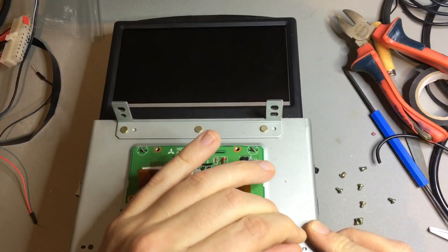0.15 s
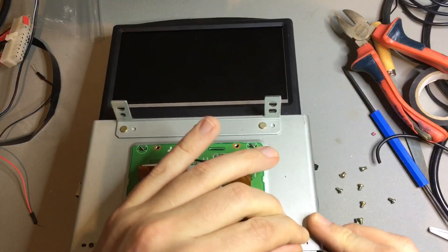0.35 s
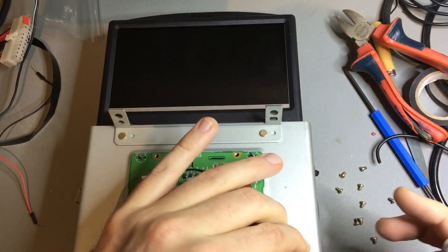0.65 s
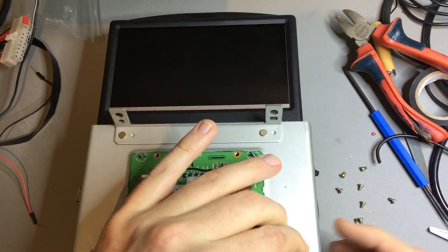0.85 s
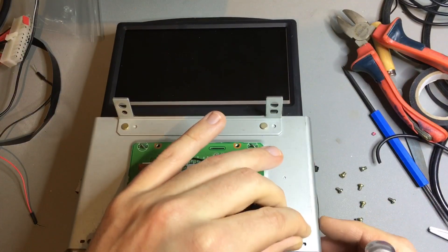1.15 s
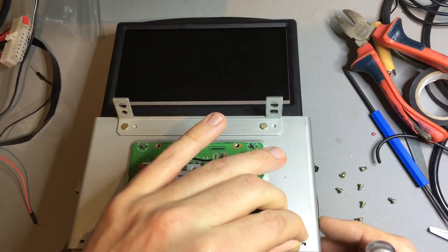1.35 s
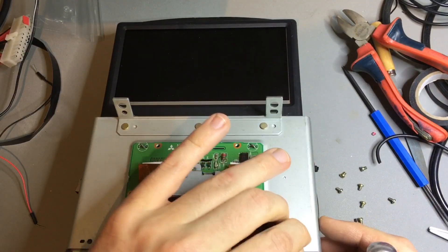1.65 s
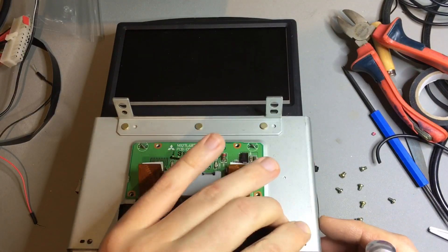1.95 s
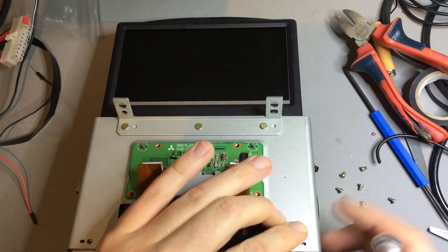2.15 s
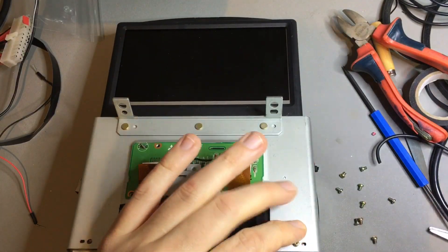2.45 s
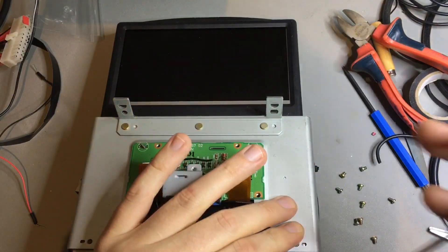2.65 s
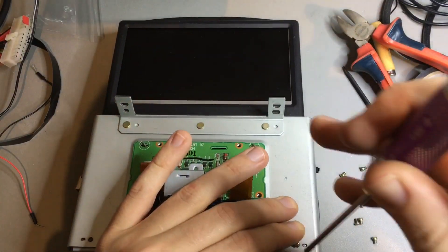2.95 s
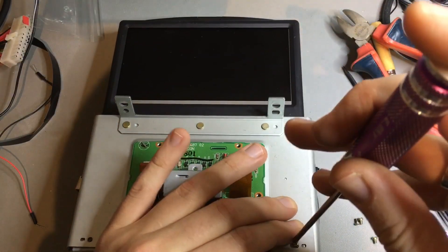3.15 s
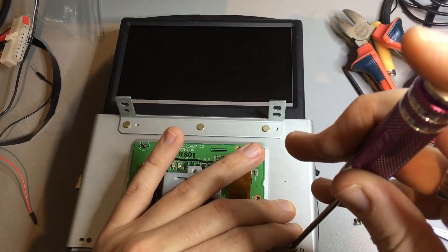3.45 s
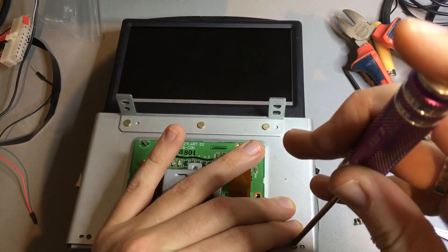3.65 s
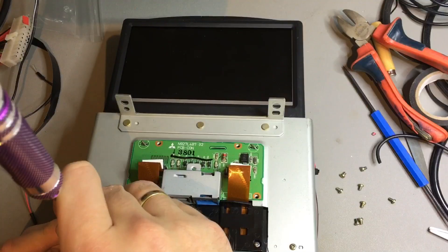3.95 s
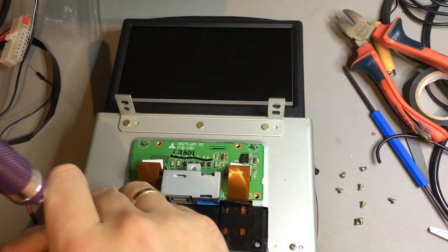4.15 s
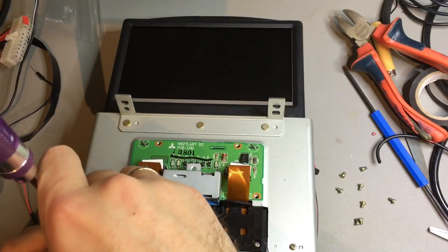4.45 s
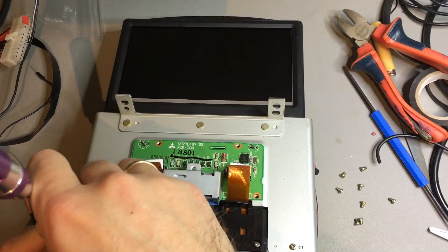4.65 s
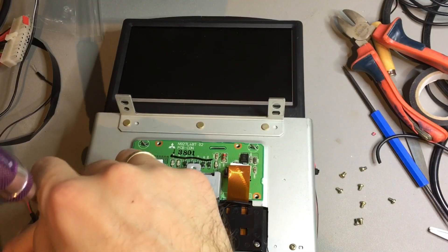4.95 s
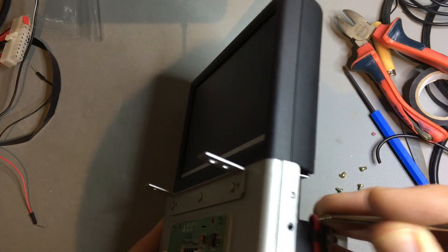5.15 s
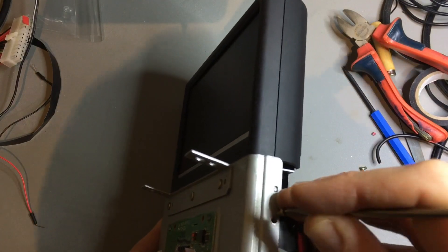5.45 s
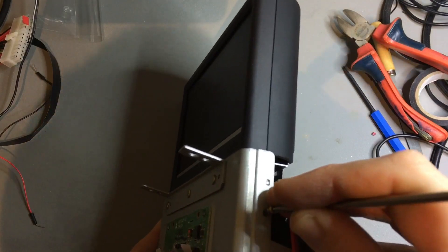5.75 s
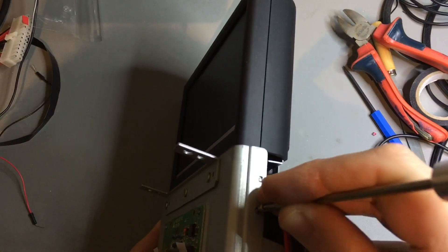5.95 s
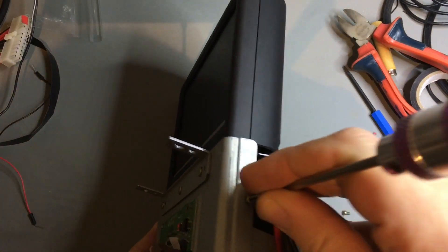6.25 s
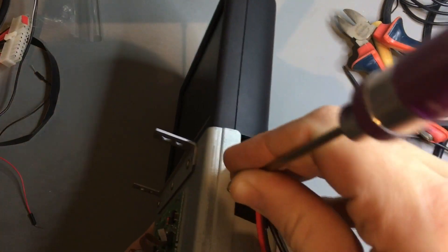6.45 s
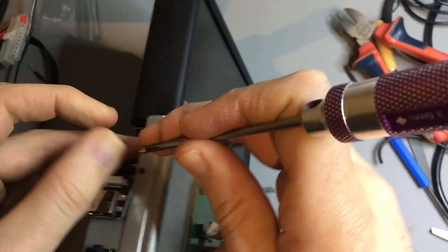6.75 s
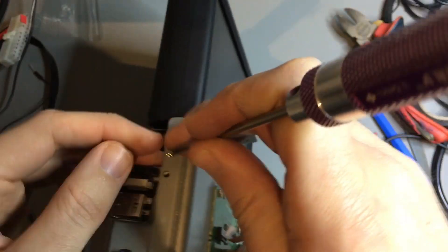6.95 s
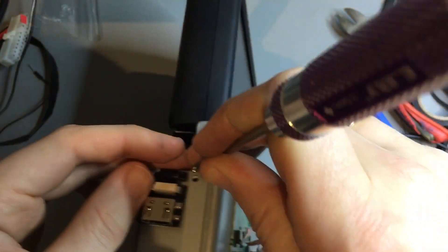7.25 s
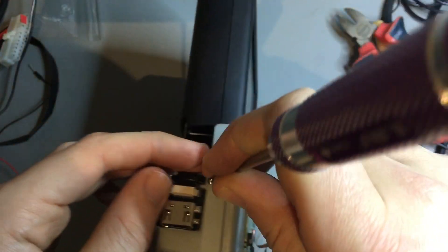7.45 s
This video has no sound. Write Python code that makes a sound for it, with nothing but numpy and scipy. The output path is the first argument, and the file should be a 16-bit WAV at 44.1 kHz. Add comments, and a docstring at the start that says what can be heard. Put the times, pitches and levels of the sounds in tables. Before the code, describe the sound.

Irregular screwdriver and small-part taps on thin metal, dry and close, with short rattles and little room echo. One heavy knock comes early, followed by crisp clicks, finger rustle and light scrapes, then more knocks mid-way and strong metallic snaps past six seconds. The bench rumbles softly under the hands. Three very brief dropouts interrupt the quiet hum and hiss.

```python
"""Metal tapping on a workbench

Small screws, fingers and a steel screwdriver tap and scrape a sheet-metal housing: noise bursts and rubbing
noise drive its resonances, and single modes ring on. Thuds are decaying bench modes.
The bench's trembling, the quiet room's hum and the microphone's hiss are shaped noise.
Three times all sound dips by 40 dB and returns within a few hundredths of a second."""
import sys
import numpy as np
from scipy import signal
from scipy.fft import rfft, irfft, next_fast_len
from scipy.io import wavfile
from scipy.ndimage import map_coordinates

SR = 44100
rng = np.random.default_rng(int(sys.argv[2]) if len(sys.argv) > 2 else 0)


def persist_wave(psi):
    """Save psi, clipped to +-1, as 16-bit WAV."""
    counts = np.round(np.clip(psi, -1, 1) * 32767).astype(np.int16)
    wavfile.write(sys.argv[1], SR, np.atleast_2d(counts).T)


N = 335204
CLIP_S = np.arange(N) / SR
EVENT_S = np.arange(SR // 2) / SR


def amp(db):
    """Gain of a level in dB."""
    return 10 ** (np.asarray(db) / 20)


def unit(x):
    """Scale to rms 1."""
    return x / np.sqrt(np.mean(x ** 2) + 1e-20)


def along(points, hz):
    """Interpolate (f/Hz, value) points on a log frequency axis."""
    f, v = np.transpose(points)
    return np.interp(np.log(hz + 1), np.log(f + 1), v)


def wobble(knots_per_s):
    """Smooth random curve through normally distributed knots."""
    knots = rng.standard_normal(int(N * knots_per_s / SR) + 4)
    return map_coordinates(knots, [np.arange(N) * knots_per_s / SR])


def filtered(x, response):
    """Apply a frequency response; zero padding leaves room for its decay."""
    size = next_fast_len(x.shape[-1] + 8192)
    spectrum = rfft(x, size) * response(np.fft.rfftfreq(size, 1 / SR))
    return irfft(spectrum, size)[..., :x.shape[-1]]


def noise(spectrum):
    """Coloured noise of rms 1; the table sets its spectral shape."""
    return unit(filtered(rng.standard_normal(N), lambda hz: amp(along(spectrum, hz))))


def add(track, start_s, x):
    """Mix x into the track, cut at the track's end."""
    i = round(start_s * SR)
    track[i:i + len(x)] += x[:N - i]


# Room hum and microphone hiss, relative density: f/Hz, level/dB
FLOOR_SPECTRUM = [(22, -20), (40, 5.5), (70, 3), (126, -8.5), (425, -12), (527, -19), (620, -16.5),
                  (1980, -23.5), (3300, -24.5), (4820, -29), (5820, -25.5), (10300, -26), (13000, -20.5),
                  (15600, -23), (16000, -55)]
FLOOR_RMS_DB = -66


def steady_floor():
    """Room hum and microphone hiss as one stationary coloured noise."""
    return amp(FLOOR_RMS_DB) * noise(FLOOR_SPECTRUM)


# Trembling, relative density: f/Hz, level/dB
TREMBLE_SPECTRUM = [(20, -120), (40, 5.5), (65, 5), (110, -4), (150, -3.5), (300, -15), (600, -120)]
# Trembling level before random wobble: t/s, level/dB
TREMBLE_LEVEL = [(0.0, -60), (0.5, -53), (0.82, -68.5), (1.23, -60.5), (2.73, -68.5), (3.0, -59.5),
                 (3.45, -72.5), (3.75, -58.5), (4.74, -67.5), (5.1, -59), (5.22, -70.5), (6.05, -69),
                 (6.24, -74), (6.58, -61), (6.84, -71), (7.37, -74), (7.6, -57)]


def bench_tremble():
    """The bench top trembles under the working hands: low noise of wandering level."""
    t_s, db = np.transpose(TREMBLE_LEVEL)
    level_db = np.interp(CLIP_S, t_s, db) + 2.8 * wobble(16)
    return amp(level_db) * noise(TREMBLE_SPECTRUM)


# Room decay: f/Hz, t60/s
ROOM_T60 = [(150, 0.37), (1000, 0.23), (5000, 0.21), (15000, 0.13)]


def room(x):
    """Each frequency of the room's answer dies at its own speed; each third of a second gets a new tail."""
    out, step = np.zeros(N), SR // 3
    for i in range(0, N, step):
        hz, t_s, grains = signal.stft(rng.standard_normal(step), SR, nperseg=256)
        decay_db = -60 * t_s / along(ROOM_T60, hz)[:, None]
        tail = signal.istft(grains * amp(decay_db), SR, nperseg=256)[1]
        late = np.pad(x[i:i + step], (200, 0))  # pre-delay, samples
        add(out, i / SR, signal.fftconvolve(late, tail / np.linalg.norm(tail)))
    return out


# Bench-top modes: f/Hz, level/dB before hardness and scatter, t60/s
BENCH_MODES = [(41.5, -1, 0.4), (61.06, 1, 0.33), (121, -7, 0.29), (152, -1.5, 0.25), (209, -9.5, 0.263),
               (252.2, -5, 0.21), (290, -3, 0.15), (341.4, -4.5, 0.17), (398.4, 0.5, 0.086),
               (454, -9.5, 0.16), (588, -8.5, 0.11), (844, -7, 0.071)]
# Housing or hand lands on the bench: t/s, level/dB, hardness/dB
THUD_EVENTS = [(0.064, -53, -20), (0.429, -40.5, -2.5), (0.595, -52.5, -10), (1.096, -27.5, -2.5),
               (1.651, -50.5, -6), (2.9, -40, -1), (3.741, -38.5, -8.5), (4.202, -53, 0), (4.23, -53.5, -9),
               (4.275, -45.5, -7.5), (5.136, -49.5, -0.5), (6.055, -63.5, 7.5), (6.352, -58, 3.5),
               (6.376, -51, 5.5), (7.395, -61, -15)]


def thuds():
    """Blunt blows ring the bench top; bending waves carry high modes first, low ones swell in late."""
    out = np.zeros(N)
    hz, mode_db, t60_s = np.transpose(BENCH_MODES)[:, :, None]
    swell = 1 - np.exp(-(EVENT_S * hz / 0.11) ** 2)
    for start_s, db, hard_db in THUD_EVENTS:
        level_db = mode_db + 3.56 * rng.standard_normal(hz.shape)
        level_db = level_db + hard_db * (hz > 180)
        level_db -= 5.2 * max(hard_db, 0) * (hz < 180)  # light, hard knocks barely move low modes
        phase = 2 * np.pi * (hz * EVENT_S + rng.random(hz.shape))
        modes = swell * amp(level_db - 60 * EVENT_S / t60_s) * np.sin(phase)
        add(out, start_s, amp(db) * np.sum(modes, axis=0))
    return out


def favour(hz, slope_db, clear_db):
    """The spot struck favours modes near one pitch; a freely held part lets the nearest ring clear."""
    def tilt_db(mode_hz):
        octaves = np.log2(mode_hz / hz)
        return -slope_db * np.abs(octaves) + clear_db * np.exp(-(octaves / 0.15) ** 2)
    return tilt_db


# Panel resonances, for rubs and taps: f/Hz, width/Hz, level/dB before tilt and scatter
SHEET_MODES = [ (605, 65, 1), (715, 100, -1), (950, 130, -5), (1140, 150, -6), (1320, 120, -2),
               (1460, 100, -2), (1640, 80, -1), ]
# Flange resonances, for rubs and taps: f/Hz, width/Hz, level/dB before tilt and scatter
BRACKET_MODES = [ (2000, 300, -5), (2350, 220, -1), (2700, 300, -6), (3160, 150, -1), (3560, 150, -2),
                 (4200, 500, -6), (5170, 500, -4), (6000, 350, -2), (6800, 400, -4), ]


def resonant(modes, tilt_db, scatter_db=0):
    """Causal response of parallel resonances of alternating sign, with random scatter of their levels."""
    gains = [amp(db + tilt_db(hz) + scatter_db * rng.standard_normal()) for hz, _, db in modes]

    def response(f):
        total = 0
        for k, (gain, (hz, width_hz, _)) in enumerate(zip(gains, modes)):
            damping = 1j * f * width_hz
            total = total + (-1) ** k * gain * damping / (hz * hz - f * f + damping)
        return total
    return response


# Skin rustle, relative density: f/Hz, level/dB
SKIN_SPECTRUM = [(1000, -54), (4500, -11.5), (7000, -10), (10000, -6.5), (13500, -4), (15600, -2),
                 (16000, -51)]
# Fingers and parts slide; the row at 3.888 s is a quarter second of louder broadband background: t/s, length/s,
# skin level/dB, sheet level/dB, bracket level/dB
RUB_STROKES = [(-0.03, 0.437, -76, -73, -73), (0.058, 0.11, -71, -98, -106), (0.3, 0.097, -86, -72, -90),
               (0.99, 0.15, -82, -73.5, -82), (1.834, 0.088, -78, -69.5, -94),
               (2.012, 0.09, -75, -67.5, -78), (2.226, 0.096, -75, -75.5, -95),
               (2.355, 0.13, -66.5, -82, -79), (2.47, 0.16, -70.5, -94, -88),
               (2.674, 0.19, -75, -73.5, -84), (3.888, 0.24, -63.5, -71.5, -70.5),
               (4.556, 0.13, -77, -70, -92), (4.877, 0.092, -66, -72, -84), (5.063, 0.055, -62, -71, -69),
               (5.17, 0.13, -66, -82, -74), (5.47, 0.093, -82, -73.5, -76), (5.724, 0.04, -87, -66, -80),
               (6.601, 0.17, -70, -71.5, -74.5), (6.936, 0.11, -71.5, -85, -83)]
STROKE_RISE_S, STROKE_FALL_S = 0.02, 0.039


def rubs():
    """Fingers rustle; parts dragged over the housing excite its resonances by stick and slip; once, the
    background swells with broadband noise."""
    gains = np.zeros((3, N))
    for start_s, length_s, *levels_db in RUB_STROKES:
        rise = (CLIP_S - start_s) / STROKE_RISE_S
        fall = (start_s + length_s - CLIP_S) / STROKE_FALL_S
        pressure = np.clip(np.minimum(rise, fall), 0, 1)
        gains += amp(levels_db)[:, None] * pressure
    slips = rng.standard_normal((2, N)) * amp(1.6 * wobble(150))
    skin = amp(1.05 * wobble(52)) * noise(SKIN_SPECTRUM)
    sheet = unit(filtered(slips[0], resonant(SHEET_MODES, favour(1000, slope_db=4, clear_db=0))))
    bracket = unit(filtered(slips[1], resonant(BRACKET_MODES, favour(2500, slope_db=16, clear_db=0))))
    return np.sum(gains * [skin, sheet, bracket], axis=0)


# A part springs free, one housing mode rings on: t/s, f/Hz, level/dB before swell and decay
RING_EVENTS = [(1.121, 3205, -43), (1.122, 6800, -49), (5.302, 1650, -56), (6.058, 612, -41.5),
               (6.382, 725, -30.5), (7.49, 1650, -60)]
RING_T60_S, RING_SWELL_S = 0.094, 0.0017


def rings():
    """Single modes swell quickly and die away, with slightly unsteady phase."""
    out = np.zeros(N)
    swell = 1 - np.exp(-EVENT_S / RING_SWELL_S)
    for start_s, hz, db in RING_EVENTS:
        drift_rad = 0.0067 * np.cumsum(rng.standard_normal(len(EVENT_S)))
        envelope = swell * amp(db - 60 * EVENT_S / RING_T60_S)
        add(out, start_s, envelope * np.sin(2 * np.pi * hz * EVENT_S + drift_rad))
    return out


# High modes of the tip, relative response: f/Hz, level/dB
TIP_RESPONSE = [(2500, -89), (6000, -26.5), (8000, -1.5), (10000, -1.5), (13000, 1), (15700, -1.5),
                (16100, -58), (17000, -34)]
# Rattle t60/s at 2 ms contact: sheet, bracket, tip
RATTLE_T60_S = (0.077, 0.082, 0.054)
RATTLE_GROWTH = 0.23  # exponent of t60 against contact time
# Lift/dB of modes near the favoured pitch: sheet, bracket
CLEAR_DB = (5.5, 4.5)
# Metal on metal, snaps to short drags: t/s, tip peak level/dB, sheet peak level/dB, bracket peak level/dB,
# favoured sheet f/Hz, favoured bracket f/Hz, contact/ms
TAP_EVENTS = [(0.128, -70, -80, -61, 1100, 2700, 1.5), (0.194, -51.5, -76, -80, 1920, 2160, 2.3),
              (0.3148, -55, -48.5, -68, 950, 2310, 3.7), (0.4284, -56, -49, -51, 596, 2000, 1.2),
              (0.4347, -47, -46, -48.5, 585, 6640, 1.2), (0.53, -44.5, -45.5, -46.5, 960, 2250, 6.5),
              (0.594, -53, -45, -50, 1090, 2000, 1.7), (0.675, -66, -75, -59, 1000, 4200, 1.2),
              (0.711, -57, -49.5, -56.5, 1140, 2210, 3.1), (0.7594, -64, -52.5, -76, 960, 2180, 2.2),
              (0.9301, -74, -57.5, -60, 1320, 2420, 1.4), (1.0947, -27.5, -19, -31.5, 645, 3300, 2.5),
              (1.1217, -42, -47, -38.5, 1400, 3170, 3.8), (1.172, -47.5, -50, -51.5, 1410, 5900, 2),
              (1.5536, -50, -62.5, -57, 626, 6070, 1.5), (1.6516, -25, -27, -31, 870, 6100, 1.7),
              (1.898, -49, -70, -53, 1430, 6000, 1.8), (1.9065, -24, -46.5, -34.5, 1406, 6000, 2.2),
              (2.3162, -62, -53, -65, 1580, 2010, 1.4), (2.768, -75, -49, -70, 950, 1960, 6.9),
              (2.781, -69, -38, -51.5, 800, 2350, 2.6), (2.8182, -51, -58, -55, 1640, 3150, 1.4),
              (2.8975, -53.5, -36, -55.5, 800, 2040, 1.1), (3.0764, -70, -62.5, -65, 1390, 2000, 1.5),
              (3.304, -69, -63.5, -62.5, 605, 2550, 1.1), (3.4541, -36, -73, -52, 1410, 5170, 0.23),
              (3.457, -64, -56, -75, 1310, 2000, 1), (3.5473, -55, -79, -80, 668, 2790, 2),
              (3.5828, -58, -60.5, -85, 1370, 5100, 1.1), (3.669, -41, -60, -53, 950, 6400, 1.4),
              (3.6735, -29.5, -46.5, -49, 950, 6500, 1.7), (3.7372, -68, -48, -61, 695, 3120, 0.74),
              (3.786, -54, -41.5, -53, 970, 2100, 5.1), (3.823, -44, -36, -49, 1010, 2630, 1.9),
              (3.8258, -26.5, -33, -33, 940, 2580, 2.24), (4.189, -50, -48, -52, 910, 3000, 3.9),
              (4.1968, -29, -29.5, -29.5, 930, 5970, 3.7), (4.273, -32.5, -29, -34, 664, 6400, 1.7),
              (4.5826, -67, -60, -59, 670, 2350, 1.9), (4.776, -50, -65, -53, 660, 3720, 1.5),
              (5.096, -43.5, -57, -41.5, 1050, 5170, 6.4), (5.1385, -31.5, -32.5, -34, 1014, 4200, 1.7),
              (5.2837, -51, -44, -39.5, 1700, 2700, 1.6), (5.287, -62, -49, -46.5, 1640, 2700, 9.5),
              (5.4134, -68, -59, -60.5, 1610, 2700, 2.5), (5.676, -56, -46.5, -55, 1396, 2350, 2.16),
              (5.7188, -63, -53.5, -76, 1190, 2330, 1.3), (5.8512, -59, -67, -55.5, 980, 6000, 3.5),
              (6.0512, -20, -38, -42.5, 1380, 2350, 0.89), (6.0542, -17.5, -39.5, -34, 1250, 6800, 2.5),
              (6.1248, -63, -54.5, -65, 736, 2370, 1.7), (6.352, -42, -24, -37.5, 1387, 2350, 0.72),
              (6.3782, -24, -20.5, -24, 1210, 2530, 2.4), (6.8405, -46, -50, -49.5, 1240, 3560, 15),
              (6.861, -44, -51, -50.5, 1250, 3510, 10.7), (7.177, -64, -63.5, -68, 1630, 3270, 13),
              (7.3203, -65, -66, -74, 1620, 3060, 8.7), (7.389, -29, -37, -33.5, 1640, 3160, 1.44),
              (7.4337, -43, -41, -43.5, 1390, 3140, 10), (7.4879, -45, -42, -47, 1730, 3300, 2.4),
              (7.5034, -44, -46, -51.5, 950, 3160, 2.2), (7.581, -52, -43, -48.5, 1640, 3140, 2.7),
              (7.5931, -36, -37, -41, 1780, 3150, 4.8)]


def taps():
    """A spiky contact and the dense rattle after it drive panel, flanges and the tip's high modes."""
    out, t_s = np.zeros(N), EVENT_S[:SR // 4]
    for start_s, tip_db, sheet_db, bracket_db, sheet_hz, bracket_hz, contact_ms in TAP_EVENTS:
        contact_s = np.clip(contact_ms, 0.3, 20) / 1000
        u = t_s / contact_s
        lasting = (contact_ms / 2) ** RATTLE_GROWTH
        near_sheet = favour(sheet_hz, slope_db=4.0, clear_db=CLEAR_DB[0])
        near_bracket = favour(bracket_hz, slope_db=4.0, clear_db=CLEAR_DB[1])
        bodies = [resonant(SHEET_MODES, near_sheet, scatter_db=0.5),
                  resonant(BRACKET_MODES, near_bracket, scatter_db=2.0),
                  lambda hz: amp(along(TIP_RESPONSE, hz))]
        first = min(0.25, 0.00036 / contact_s)  # short contacts start at once, drags swell
        envelope = (u + first) ** 1.42 * np.exp(-1.3 * u)
        spikes = rng.standard_normal(len(t_s)) * amp(6.68 * rng.standard_normal(len(t_s)))
        grit = envelope * spikes
        for body, peak_db, t60_s in zip(bodies, (sheet_db, bracket_db, tip_db), RATTLE_T60_S):
            decay = amp(-60 * t_s / (t60_s * lasting))
            rattle = 0.55 * (1 - np.exp(-u * u)) * decay * rng.standard_normal(len(t_s))
            sound = filtered(grit + rattle, body)
            add(out, start_s, amp(peak_db) * sound / np.abs(sound).max())
    return out


def scene():
    """Mix floor, bench, rubs and hits; only taps and rings feed the room."""
    hits = taps() + rings()
    background = steady_floor() + bench_tremble() + amp(-16) * room(hits)
    return (background + thuds() + rubs() + hits)[None]


# Brief dips of all sound: t/s, half width/s
LEVEL_DIPS = [(3.871, 0.03), (5.173, 0.03), (6.774, 0.021)]
LOW_CUT_HZ, TOP_HZ = 35, 16700


def record(dry):
    """Brief dips to 1 % gain, the microphone's second-order low cut, a sharp band limit."""
    dips = [np.clip(np.abs(CLIP_S - t_s) / half_s + 0.01, 0, 1) for t_s, half_s in LEVEL_DIPS]

    def response(hz):
        low_cut = (1j * hz) ** 2 / (LOW_CUT_HZ ** 2 - hz ** 2 + 1j * hz * LOW_CUT_HZ * np.sqrt(2))
        return low_cut * (hz < TOP_HZ)
    return filtered(dry * np.prod(dips, axis=0), response)


dry = scene()
out = record(dry)
persist_wave(out)
```